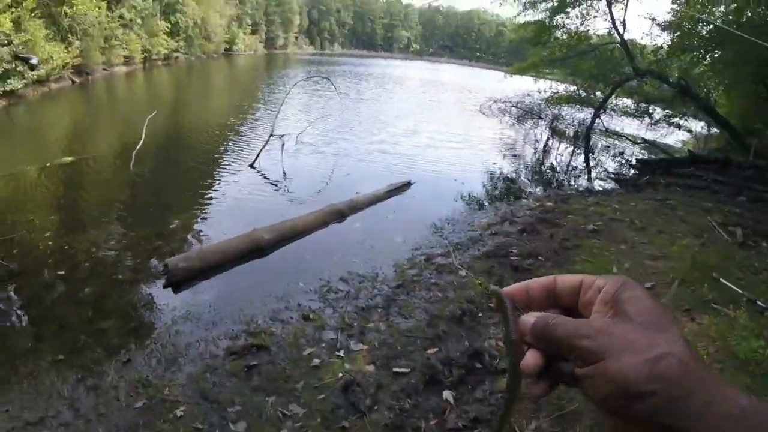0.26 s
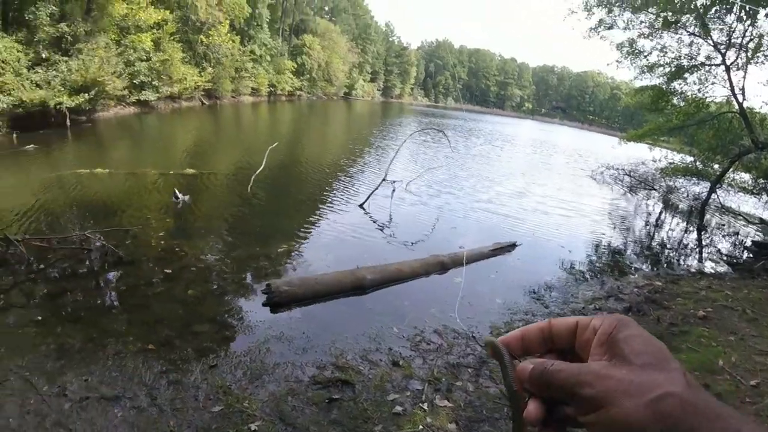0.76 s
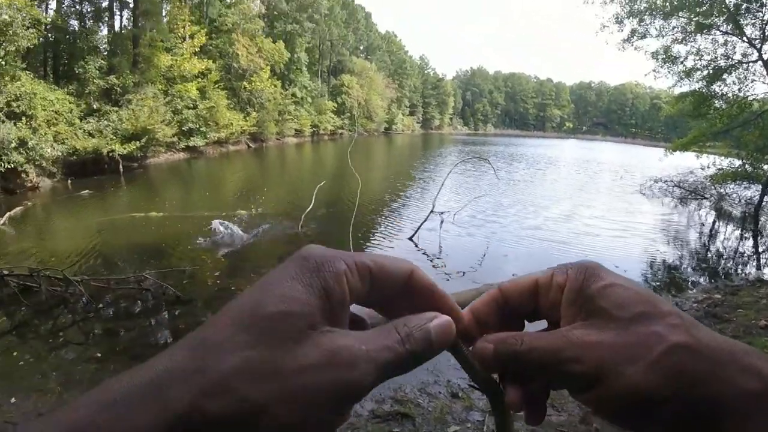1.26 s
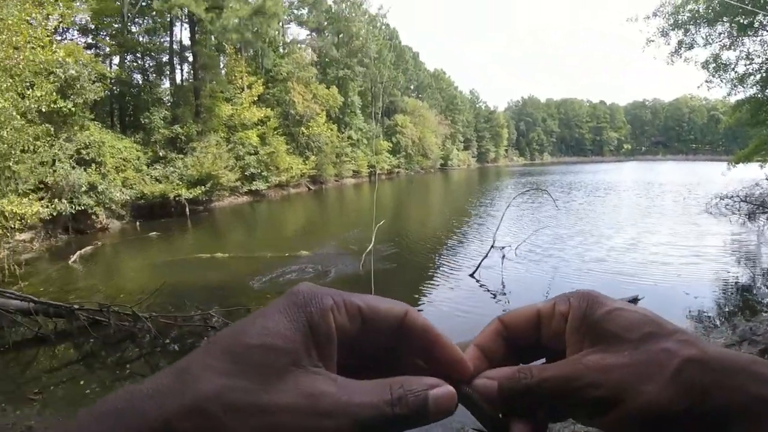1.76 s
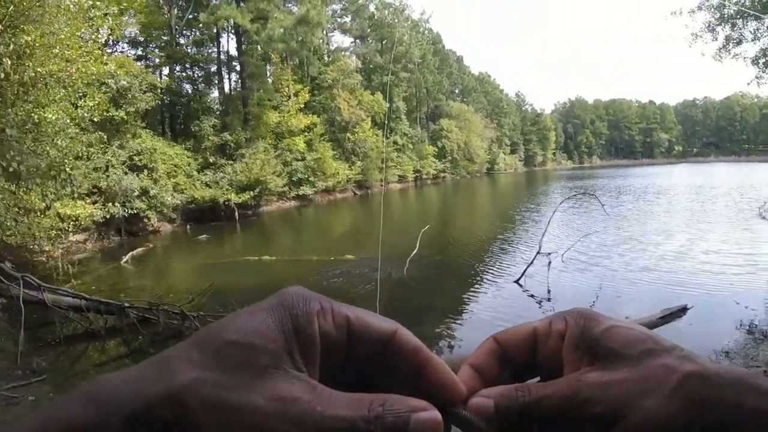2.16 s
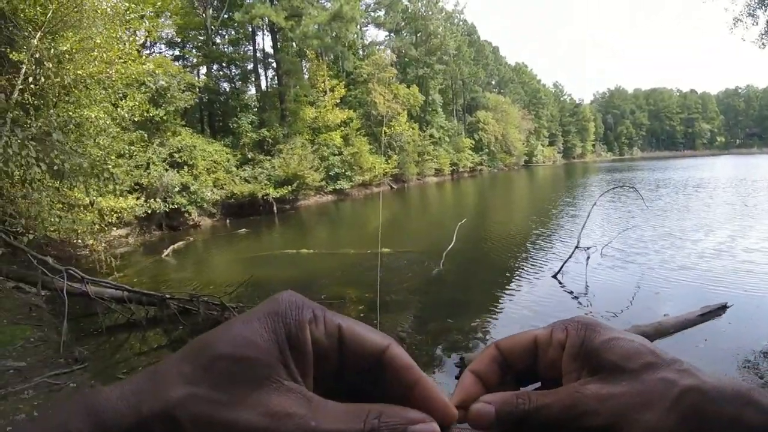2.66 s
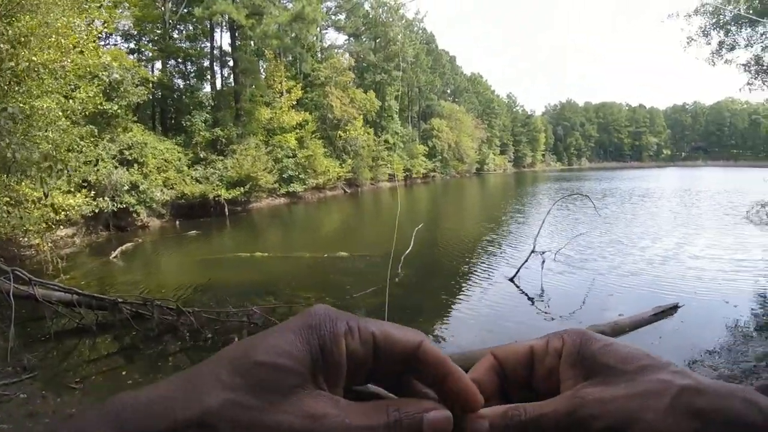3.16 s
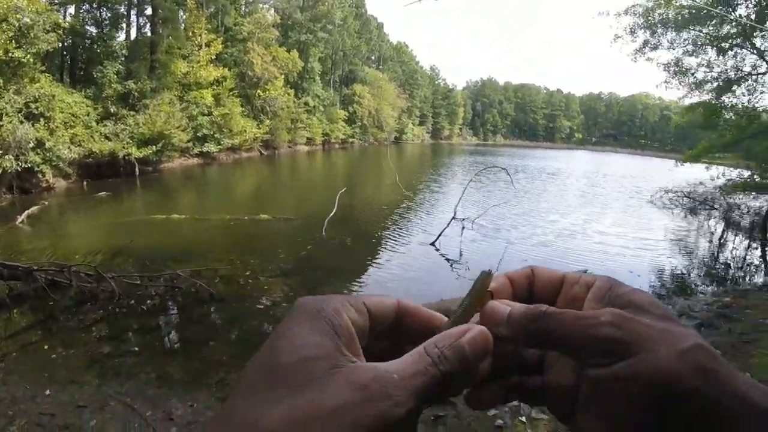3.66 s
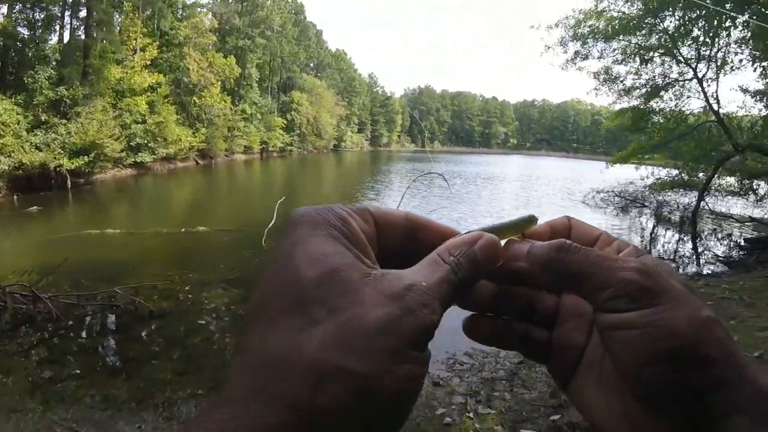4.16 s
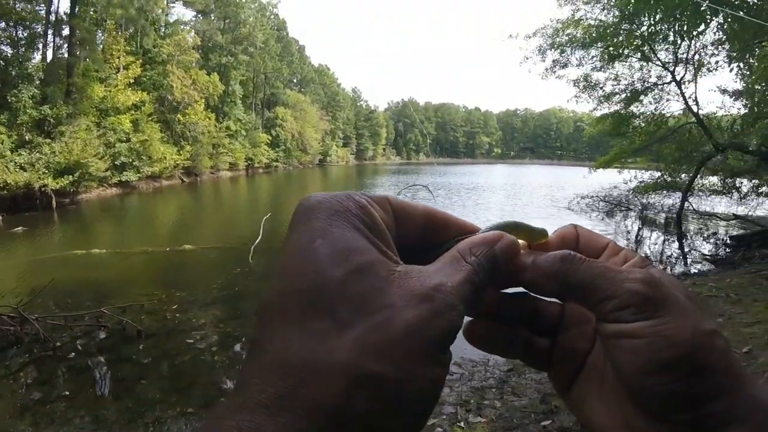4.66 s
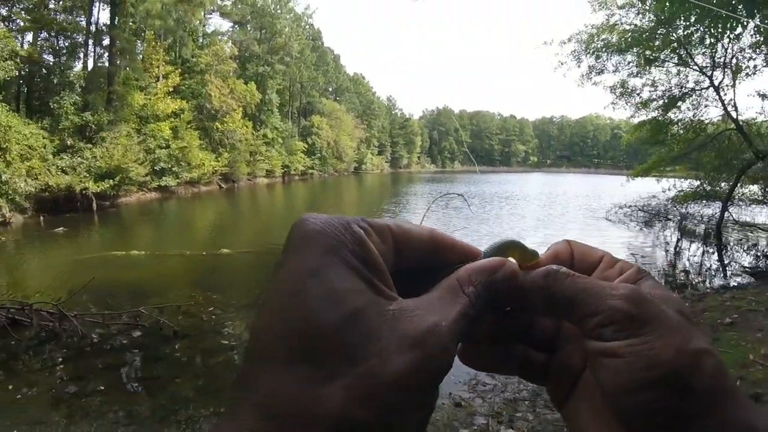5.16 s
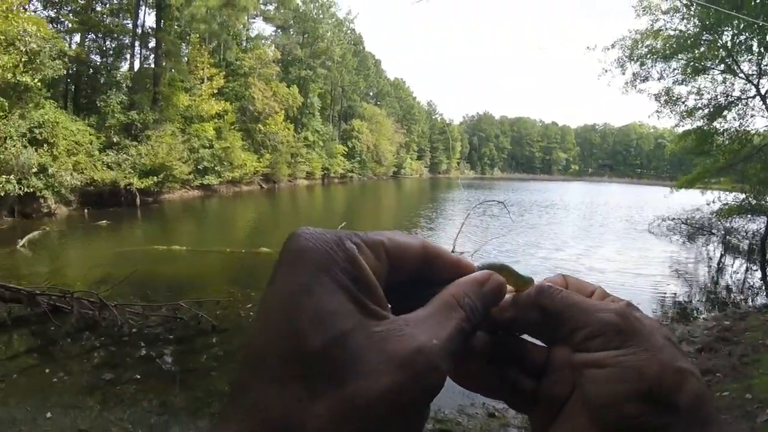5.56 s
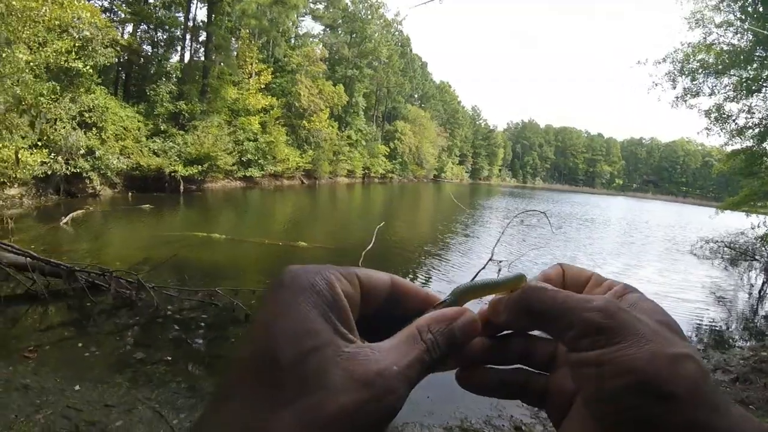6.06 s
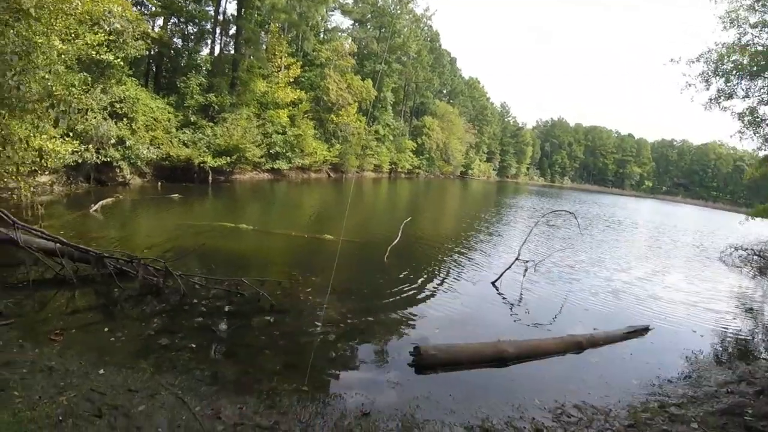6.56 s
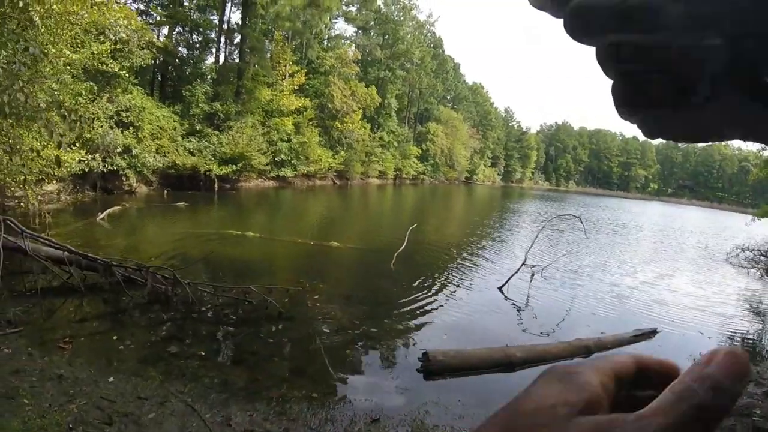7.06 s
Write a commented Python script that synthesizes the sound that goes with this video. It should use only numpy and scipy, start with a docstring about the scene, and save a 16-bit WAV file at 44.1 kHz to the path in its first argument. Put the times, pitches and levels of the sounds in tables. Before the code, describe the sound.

A brief swish of cloth leads into a sharp little splash as bait lands in a pond, with a plop, falling drops and a short gurgle. Then come scattered light clicks, faint rubbing and dull knocks from hands handling a soft lure close to a body-worn microphone. Crickets and other insects trill steadily throughout, above a low outdoor rumble and a distant engine hum.

```python
"""A cricket pulses over an insect chorus and the drone of a far engine, on a pond bank in summer.
A sleeve swishes as a scrap of bait is tossed. The bait smacks into the water, the hole it makes
plops shut and spray patters back. Then fingers work a soft plastic lure, with small ticks and
dull bumps that travel through the body to a camera worn on the chest."""
import sys
import numpy as np
from scipy import signal
from scipy.fft import rfft, irfft
from scipy.io import wavfile
from scipy.ndimage import uniform_filter1d

SR = 44100
rng = np.random.default_rng(int(sys.argv[2]) if len(sys.argv) > 2 else 0)


def inscribe(sig):
    """Save sig as 16-bit PCM at rate SR to the path in sys.argv[1].

    A 1-D sig is mono; a 2-D sig holds one channel per row.
    Samples are clipped to [-1, 1] before scaling.
    """
    pcm = np.round(np.clip(np.atleast_2d(sig).T, -1, 1) * 32767)
    wavfile.write(sys.argv[1], SR, pcm.astype(np.int16))


N = 322635
TIME = np.arange(N) / SR

# open air over the pond: pitch_hz, relative_db
AIR_SPECTRUM = [(12, -43), (33, -4.5), (65, -3.5), (120, -8), (190, -12.5), (300, -17.5), (550, -20),
                (800, -19.5), (1400, -30), (2800, -32.5), (4300, -37), (5300, -34), (8800, -40),
                (10400, -51), (13500, -54)]
# steady engine tones: multiple_of_shaft_rate, level_db
ENGINE_TONES = [(3, -53), (4, -53), (5, -63.5)]
# slow swells of the engine's higher drone: loudest_s, level_db, rise_s, fall_s
DRONE_SWELLS = [(1.1, -50, 1.1, .62), (2.6, -52.5, 0.41, 1.1), (6.4, -56, 1, 0.72)]
# bands of far insects: pitch_hz, width_hz, level_db, trill_hz
CHORUS_BANDS = [(5380, 380, -74, 21), (5810, 640, -70.5, 44), (6524, 480, -68.5, 16), (7040, 3750, -72, 57),
                (11920, 1900, -80.5, 27)]
# farther crickets: pitch_hz, strokes_per_s, pitch_fall_share, level_db, loudest_s
FAR_CRICKETS = [(5260, 13, 0.014, -62, 4.665), (5640, 10.37, 0.0091, -60.5, 4.835),
                (5920, 11, 0.018, -64, 2.1)]
# loudness of the near cricket: time_s, level_db
NEAR_CRICKET_LEVEL = [(0, -61.5), (3.4, -57), (5.0, -63), (5.6, -58), (7.3, -62)]
# sliding cloth: pitch_hz, relative_db
CLOTH_SPECTRUM = [(180, -25), (300, 1), (857, -9), (1130, -5), (2770, -3), (5130, -13), (5810, -22),
                  (6680, -13), (12000, -49), (15600, -70), (22000, -120)]
# the sleeve brushing the body: loudest_s, level_db, rise_s, fall_s
SWISHES = [(.088, -42.5, 0.074, 0.041), (.58, -55.5, 0.12, 0.068)]
# ticks of lure, hook and line: start_s, level_db, pitch_hz, fade_s
TICKS = [(2.1265, -39.5, 2600, 0.058), (2.146, -45, 2700, 0.052), (2.255, -48, 2700, .05),
         (3.653, -44.5, 3600, .02), (3.8296, -45.5, 3600, .025), (6.884, -45.5, 1850, .05),
         (6.9286, -37.5, 3900, .011)]
# bumps through the body: start_s, pitch_hz, level_db
BUMPS = [(1.479, 58, -27.5), (1.485, 167, -35), (2.082, 383, -30.5), (2.121, 45, -33.5), (5.725, 128, -27),
         (5.733, 59.3, -32), (5.755, 434, -34), (5.872, 37.5, -34), (5.918, 65.5, -32), (6.037, 70.5, -31),
         (6.206, 65, -33)]
# fingers rubbing the lure: loudest_s, level_db, rise_and_fall_s
RUBS = [(3.978, -62, 0.089), (4.562, -63.5, 0.036), (5.666, -60.5, .05)]
# drop sizes in the spray: usual_pitch_hz, spread_octaves, relative_db
DROP_SIZES = [(3430, 0.382, -1.5), (834, 0.2, -3)]
# spray thrown up, then falling back: loudest_s, level_db, rise_s, fall_s, pitch_multiple
SHOWERS = [(.87, -55.5, 0.04, 0.9, 1.0), (1.39, -55, 0.025, 0.042, 1.6), (1.5, -52, 0.065, .11, .9)]
# the surface sloshing afterwards: loudest_s, level_db, rise_s, fall_s, usual_pitch_hz
SLOSHES = [(1.515, -47.5, 0.02, 0.035, 496), (1.715, -49, 0.03, .06, 390)]
# slaps of the bait and the water it throws up: start_s, level_db, pitch_hz, fade_s
SLAPS = [(.8324, -32, 5170, 0.036), (0.8413, -28, 3970, 0.0096), (.843, -33, 800, 0.095),
         (.847, -34, 3000, .08), (.858, -36.5, 4330, 0.11), (0.917, -36.5, 3250, 0.024),
         (1.009, -38.5, 2500, 0.058), (1.0311, -24, 4300, 0.019), (1.034, -32.5, 2240, 0.076),
         (1.0447, -39, 3730, 0.067)]
# the sharp crack of the bait hitting the water, and the loudest bubbles: start_s, pitch_hz, level_db
CRACK_AND_BUBBLES = [(.834, 2230, -24), (0.8408, 5000, -22), (.8478, 960, -34), (.917, 725, -31.5),
                     (.979, 490, -37), (1.0105, 523, -35), (1.0307, 2120, -24), (1.0335, 640, -31.5),
                     (1.057, 975, -34.5), (1.296, 3560, -33.5), (1.3456, 2660, -35.5), (1.4647, 2400, -36),
                     (1.4902, 2690, -26.5)]


def gain(db):
    """Turn decibels into a number to multiply a sound by."""
    return 10 ** (np.asarray(db) / 20)


def normalise(x):
    """Scale a signal so its average strength (rms) is 1."""
    return x / np.sqrt(np.mean(x ** 2))


def add(out, start_s, sound):
    """Mix a sound in at a given time."""
    start = max(int(start_s * SR), 0)
    out[start:start + len(sound)] += sound[:max(N - start, 0)]


def wander(turns_per_s):
    """A smooth random wobble, about 1 in size."""
    hold = int(SR / turns_per_s)
    steps = np.repeat(rng.standard_normal(400), hold)[:N]
    return normalise(uniform_filter1d(uniform_filter1d(steps, hold), hold))


def swells(rows):
    """A loudness curve made of smooth humps, each with its own rise and fall."""
    power = 0
    for loudest_s, db, rise_s, fall_s in rows:
        away = (TIME - loudest_s) / np.where(TIME < loudest_s, rise_s, fall_s)
        power = power + (gain(db) * np.exp(-away ** 2)) ** 2
    return np.sqrt(power)


def soften(x, above_hz):
    """Turn down the treble."""
    return signal.sosfilt(signal.butter(2, above_hz, fs=SR, output="sos"), x)


def colour(x, spectrum):
    """Shape a sound's lows and highs to follow a spectrum table."""
    hz, db = np.transpose(spectrum)
    log_hz = np.log(np.maximum(np.arange(N // 2 + 1) * SR / N, 1))
    gains = gain(np.interp(log_hz, np.log(hz), db))
    return normalise(irfft(rfft(x) * gains, N))


def hiss(hz, width_hz, samples=N):
    """Steady noise around one pitch."""
    band = signal.iirpeak(hz, hz / width_hz, fs=SR)
    once = signal.lfilter(*band, rng.standard_normal(samples))
    return normalise(signal.lfilter(*band, once))


def burst(hz, fade_s, width_share):
    """A sudden puff of noise that drops 60 dB in fade_s."""
    t = np.arange(SR // 4) / SR
    return hiss(hz, hz * width_share, len(t)) * 1000 ** (-t / fade_s) / 2


def ring(hz, fade_s, glide, rise_s):
    """A tone that drops 60 dB in fade_s while its pitch climbs by the share glide."""
    t = np.arange(int(fade_s * SR)) / SR
    tone = np.sin(2 * np.pi * hz * t * (1 + glide * t / fade_s / 2))
    return tone * 1000 ** (-t / fade_s) * (1 - np.exp(-t / rise_s))


def air():
    """Far leaves hiss over a low rumble that wavers more than they do."""
    breeze = colour(rng.standard_normal(N), AIR_SPECTRUM)
    rumble = normalise(soften(rng.standard_normal(N), above_hz=160))
    return breeze * gain(-49 + .5 * wander(1.935)) + rumble * gain(-61 + 2.6 * wander(3.8))


def engine(shaft_hz=18.98):
    """A far engine's low tones carry steadily over the water; a higher one wavers, swells and fades."""
    drift_s = np.cumsum(wander(1.5)) / SR

    def tone(multiple, wobble):
        cycles = multiple * shaft_hz * (TIME + wobble * drift_s)
        return np.sqrt(2) * np.sin(2 * np.pi * (cycles + rng.random()))

    steady = sum(gain(db) * tone(multiple, wobble=.001) for multiple, db in ENGINE_TONES)
    return steady + swells(DRONE_SWELLS) * tone(multiple=7, wobble=.006)


def chorus(trill_db=1.5, waver_db=1.0):
    """Many far insects blur into bands of hiss that trill a little."""
    out = np.zeros(N)
    for hz, width_hz, db, trill_hz in CHORUS_BANDS:
        trill_rate = trill_hz * (1 + .076 * wander(6.4))
        trill = np.sin(2 * np.pi * np.cumsum(trill_rate) / SR)
        out += gain(db + trill_db * trill + waver_db * wander(6)) * hiss(hz, width_hz)
    return out


def wing_strokes(count, per_s, hz, fall, half_length_s, rasp):
    """A cricket's toothed wing slows as it closes, so the tone falls; uneven teeth roughen it."""
    # a stroke is loudest each time count passes a whole number
    from_peak = ((count + .5) % 1 - .5) / per_s / half_length_s
    teeth = normalise(uniform_filter1d(rng.standard_normal(N), size=120))
    pitch_hz = hz * (1 - fall * np.clip(from_peak, -1, 1) + rasp * teeth)
    tone = np.sqrt(2) * np.sin(2 * np.pi * np.cumsum(pitch_hz) / SR)
    return tone * np.exp(-2 * from_peak ** 2) * gain(wander(10))


def crickets(first_s=.114, every_s=.09643, echo_s=.038, echo_db=-12, swell_s=.7):
    """A near cricket echoes off the bank; farther ones swell and fade, each at its own time and stroke rate."""
    count = (TIME - first_s) / every_s
    near = wing_strokes(count, 1 / every_s, hz=5440, fall=.0083, half_length_s=.018, rasp=.0083)
    near *= gain(np.interp(TIME, *np.transpose(NEAR_CRICKET_LEVEL)))
    out = near.copy()
    add(out, echo_s, gain(echo_db) * near)
    for hz, per_s, fall, db, loudest_s in FAR_CRICKETS:
        swell = 1 / (1 + ((TIME - loudest_s) / swell_s) ** 2)
        count = (TIME - loudest_s) * per_s + .02 * wander(1.9)
        out += gain(db) * swell * wing_strokes(count, per_s, hz, fall, half_length_s=.015, rasp=.008)
    return out


def sleeve():
    """Cloth slides: countless fibres catch and let go."""
    fibres = rng.standard_normal(N) * gain(4.1 * rng.standard_normal(N))
    return colour(fibres, CLOTH_SPECTRUM) * swells(SWISHES) * gain(.56 * wander(44.6))


def hands(bump_cycles=6.7):
    """Fingers tick and rub on the lure; the body deadens each bump within a few vibrations."""
    out = np.zeros(N)
    for start_s, db, hz, fade_s in TICKS:
        add(out, start_s, gain(db) * burst(hz, fade_s, width_share=.69))
    for start_s, hz, db in BUMPS:
        add(out, start_s, gain(db) * ring(hz, bump_cycles / hz, glide=0, rise_s=.0011))
    rubbing = sum(gain(db) * np.exp(-((TIME - at_s) / rise_s) ** 2) for at_s, db, rise_s in RUBS)
    return out + rubbing * hiss(hz=4800, width_hz=5000)


def patter(hz, octaves, per_s, scatter_db, cycles, start_s=.8, length_s=1.5):
    """Drops or bubbles ring briefly at random times, scattered around one pitch."""
    out = np.zeros(N)
    for when, size, force in rng.random(size=(int(per_s * length_s), 3)):
        pitch_hz = hz * 2 ** np.clip(octaves * np.log(size / (1 - size)), -1.5, 1.5)
        db = scatter_db * min(-np.log(force), 4)
        drop = ring(pitch_hz, cycles / pitch_hz, glide=.16, rise_s=.0001)
        add(out, start_s + when * length_s, gain(db) * drop)
    return normalise(out) * np.sqrt(length_s * SR / N)  # strength 1 while the patter lasts


def spray():
    """Fine and large drops shower down, then the settling surface gurgles."""
    out = np.zeros(N)
    for *hump, pitch_multiple in SHOWERS:
        for hz, octaves, db in DROP_SIZES:
            drops = patter(pitch_multiple * hz, octaves, per_s=800, scatter_db=.5, cycles=12.5)
            out += swells([hump]) * gain(db) * drops
    for *hump, hz in SLOSHES:
        out += swells([hump]) * patter(hz, octaves=.12, per_s=300, scatter_db=1.0, cycles=21)
    return out


def splash(ring_cycles=21, plop_s=1.002, plop_db=-29):
    """The bait hits with a sharp crack, bubbles ring with a rising pitch and the hole plops shut."""
    out = np.zeros(N)
    for start_s, db, hz, fade_s in SLAPS:
        add(out, start_s, gain(db) * burst(hz, fade_s, width_share=.91))
    for start_s, hz, db in CRACK_AND_BUBBLES:
        add(out, start_s, gain(db) * ring(hz, ring_cycles / hz, glide=.084, rise_s=.00025))
    add(out, plop_s, gain(plop_db) * ring(hz=367, fade_s=.16, glide=.095, rise_s=.0008))
    return soften(out, above_hz=8500)  # the splash's highest treble is softened


def scene():
    """All the sounds together, the same on the left and right."""
    mono = air() + engine() + crickets() + chorus() + sleeve() + splash() + spray() + hands()
    return np.array([mono, mono])


def record(dry):
    """The camera cuts off the highest treble."""
    top_hz = 13600
    return signal.sosfilt(signal.ellip(10, .2, 70, top_hz, fs=SR, output="sos"), dry)


dry = scene()
out = record(dry)
inscribe(out)
```